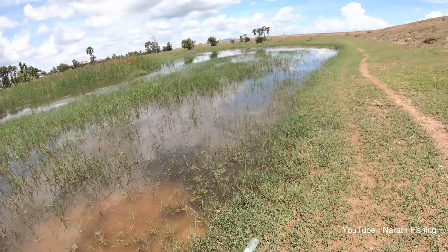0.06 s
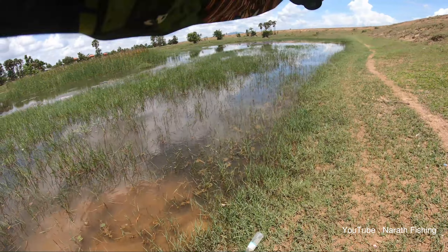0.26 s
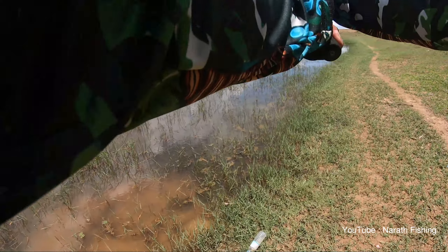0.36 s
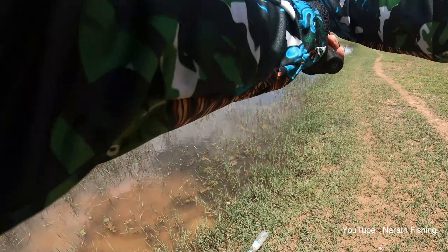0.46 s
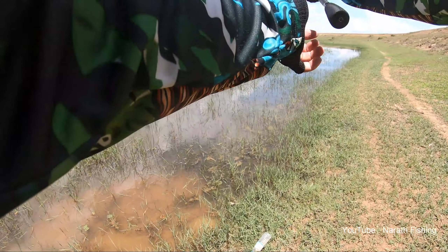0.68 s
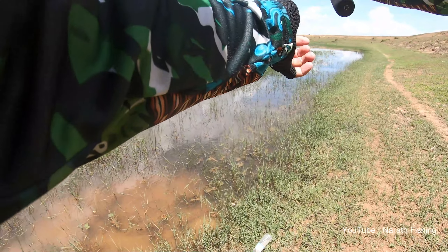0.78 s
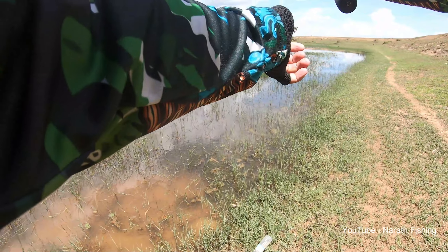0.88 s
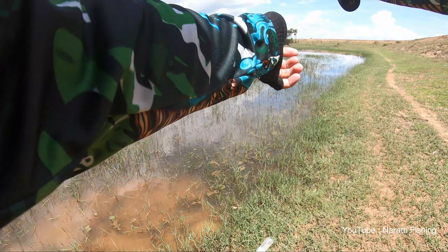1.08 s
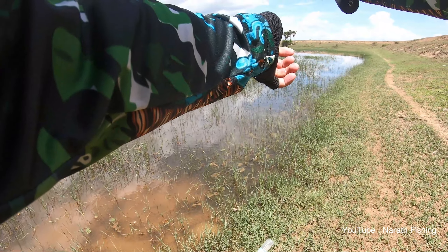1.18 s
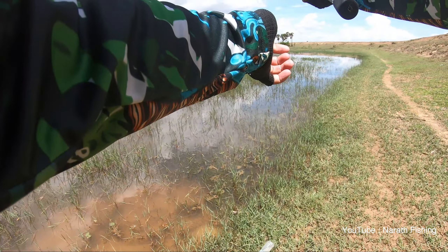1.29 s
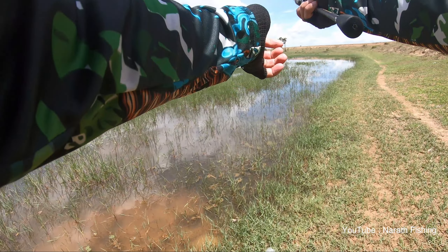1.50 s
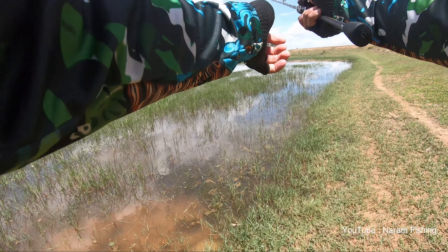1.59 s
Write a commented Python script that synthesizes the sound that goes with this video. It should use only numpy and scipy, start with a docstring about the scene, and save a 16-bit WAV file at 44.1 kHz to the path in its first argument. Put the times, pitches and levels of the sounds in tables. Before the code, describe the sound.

A fishing rod cast, heard from the angler's chest beside an open pond. Sleeves rustle and wind rumble builds from 0.2 seconds; at 0.35 a sharp bright whoosh lands with a knock and heavy low buffets, strongest on the right. The spool whines downward until about 0.8, amid small scuffs. Faint ticks follow around 1.15-1.35 over fading wind, thin bird whistles and insect hiss.

```python
"""Bank of a pond: an angler casts, with a two-port microphone on the chest.
Wind is low-frequency buffets, rumble and flutter, strongest on the right port; the sleeves rustle as dense grains.
Rod and line whoosh past as shaped noise, the spool whines in odd harmonics, filtered clicks make the tackle tick
and swells of band noise make the scuffs and the whoosh's narrow whistling bands. A small bird repeats an arched
whistle, a gliding sine, and insects sizzle in the grass as a narrow throbbing hiss, over the open field's noise."""
import sys
import numpy as np
from scipy import signal
from scipy.fft import rfft, irfft
from scipy.io import wavfile

SR = 44100
rng = np.random.default_rng(int(sys.argv[2]) if len(sys.argv) > 2 else 0)


def amplitude_ratio(level_db):
    """Convert a level in decibels to the matching linear amplitude (field) ratio."""
    exponent = np.asarray(level_db, float) / 20
    return 10 ** exponent


def digitize_waveform(pressure):
    """Quantize a signal to 16-bit integers and store it at the path in sys.argv[1].

    Rows of a 2-D input are taken as channels; values are limited to [-1, 1].
    """
    field = np.atleast_2d(pressure).T
    bounded = np.clip(field, -1, 1)
    quanta = np.round(bounded * 32767).astype(np.int16)
    wavfile.write(sys.argv[1], SR, quanta)


N = 72765   # samples, 1.65 s


def rms_one(x):
    """Scale to rms 1."""
    return x / np.sqrt(np.mean(x ** 2) + 1e-20)


def in_time(rows, shift=0):
    """Columns of a table as curves over all samples, moved later by shift seconds."""
    s, *columns = np.transpose(rows)
    return [np.interp(np.arange(N) / SR - shift, s, c) for c in columns]


def at_hz(points, hz):
    """Table read on a log-frequency axis."""
    p = np.array(points, float)
    return np.interp(np.log(hz + 1), np.log(p[:, 0] + 1), p[:, 1])


def shaped(x, points):
    """Colour by a table of dB over frequency; rms 1."""
    gain = amplitude_ratio(at_hz(points, np.fft.rfftfreq(N, 1 / SR)))
    return rms_one(irfft(rfft(x) * gain, N))


def band(x, low_hz, high_hz):
    """Band-pass, run twice for steep edges."""
    sos = signal.butter(2, [low_hz, high_hz], "band", fs=SR, output="sos")
    return signal.sosfilt(sos, signal.sosfilt(sos, x))


def drift(rate_hz):
    """Slow random wander of rms 1: noise through two equal one-pole low-passes."""
    r = np.exp(-2 * np.pi * rate_hz / SR)
    wander = signal.lfilter([1], [1, -2 * r, r * r], rng.standard_normal(N + SR))
    return rms_one(wander[SR:])   # the first second lets the filter settle


def tone(hz):
    """Sine of rms 1 that follows a pitch curve, from a random phase."""
    return np.sqrt(2) * np.sin(2 * np.pi * (np.cumsum(hz) / SR + rng.random()))


def hiss(spectrum, level_db):
    """Two unrelated draws of coloured noise under one level."""
    return shaped(rng.standard_normal((2, N)), spectrum) * amplitude_ratio(level_db)


def field():
    """Open field: a wide, nearly steady noise and a treble layer that rises and falls."""
    # Colour of the wide noise: (frequency [Hz], density [dB per Hz])
    field_colour = [(150, -5), (300, -2), (450, -12.5), (750, -9.5), (1400, -12), (2200, -5.5),
                    (4200, -12.5), (5700, -13), (7500, -15.5), (11000, -44), (15400, -60)]
    # Swell of the treble: (time [s], level [dB])
    treble_level = [(0, -57.5), (.16, -68.5), (.3, -54), (.8, -61.5), (1.12, -63), (1.3, -70),
                    (1.65, -71.5)]
    # Colour of the treble: (frequency [Hz], density [dB per Hz])
    treble_colour = [(2060, -37), (3500, -1.5), (4380, 0), (6120, -9), (7560, -3.5), (9820, -1),
                     (10900, -9), (14300, -41), (15400, -26)]
    wide = hiss(field_colour, -63.5 + 0.59 * drift(2.8))
    treble = hiss(treble_colour, in_time(treble_level)[0] + 0.46 * drift(36))
    return wide + treble


def insects():
    """Insects in the grass: noise in a narrow peak, its level throbbing at random."""
    # Swell of the sizzle: (time [s], level [dB])
    insect_level = [(.45, -67), (.6, -61), (1.0, -67.5), (1.2, -64.5), (1.4, -67.5), (1.5, -77),
                    (1.55, -84)]
    centre_hz, width_hz, throb_db = 7650, 500, 2.5
    peak = [(centre_hz - 3 * width_hz, -50), (centre_hz - width_hz / 2, -2), (centre_hz, 0),
            (centre_hz + width_hz / 2, -2), (centre_hz + 3 * width_hz, -50)]
    return hiss(peak, in_time(insect_level)[0] + throb_db * drift(62))


def bird():
    """Small bird: a sine on the same arched glide each time, its falling end weaker in the repeats."""
    # The whistle: (time after its start [s], pitch [Hz], level [dB])
    whistle = [(0, 6110, -17), (.03, 6620, 1), (.08, 6910, 1), (.17, 7450, -5.5), (.21, 7120, -4),
               (.235, 6170, 4), (.265, 4960, 3), (.28, 4950, -18)]
    # Each whistle: (start [s], level [dB], further level of the falling end [dB])
    calls = [(-.165, -64, 0), (.17, -64, -10), (.505, -65, -13), (.845, -65, -8)]
    turn_s = .19   # the falling end's level is reached here
    faded_whistle = [(-.01, whistle[0][1], -71)] + whistle + [(.3, whistle[-1][1], -60)]
    out = 0
    for start_s, db, end_db in calls:
        hz, level_db = in_time(faded_whistle, shift=start_s)
        falling = in_time([(turn_s - .04, 0), (turn_s, 1)], shift=start_s)[0]
        level = amplitude_ratio(db + level_db + end_db * falling + 1.2 * drift(40))
        out = out + level * tone(hz * (1 + .005 * drift(150)))
    return out


def wind():
    """Wind at the microphone: windowed sine buffets on the right port, rumble and flutter on both."""
    # Buffets: (centre [s], peak [dB], frequency [Hz], length [cycles])
    buffet_rows = [(.139, -22.5, 36.7, 3.4), (0.197, -19, 106, 2.4), (0.224, -22, 55.3, 5.6),
                   (0.261, -21, 94.5, 4.9), (0.266, -15.5, 38.2, 3.9), (0.303, -21, 95, 2.8),
                   (0.315, -10, 35.5, 2.7), (0.328, -10, 107, 3.15), (.344, -9, 24.7, 1.67),
                   (0.353, -2.5, 90, 1.71), (0.372, -17, 101, 0.81), (0.378, -16.5, 26, 1.5),
                   (0.42, -16.5, 39.4, 4.8), (0.435, -13.5, 101, 1.2), (.487, -22.5, 23.4, 1.6),
                   (0.526, -26.5, 87, 1.4), (0.595, -22.5, 67.5, 4.3), (0.74, -21, 43.4, 3.4),
                   (0.821, -24.5, 71.6, 3.2), (0.861, -21, 81, 1.26), (.894, -22, 77, 2.7),
                   (.92, -21, 69.4, 1.6), (0.966, -23.5, 67.3, 6.3), (0.974, -26.5, 116, 4.9),
                   (1.049, -17.5, 68, 1.36), (1.081, -25, 104.5, 2.1), (1.146, -23.5, 92, 1.77),
                   (1.288, -26.5, 36.4, 4.2), (1.356, -36.5, 121, 0.95), (1.529, -34.5, 39.6, 2.6)]
    # Rumble between the buffets: (time [s], right port [dB], left port [dB])
    rumble_level = [(0, -55, -50), (.1, -34, -44.5), (.22, -28, -40.5), (.3, -39, -39), (.42, -41, -40),
                    (.55, -31.5, -46.5), (.66, -47.5, -52.5), (.8, -36.5, -46), (1.0, -43, -52),
                    (1.1, -47, -41.5), (1.2, -63, -49.5), (1.28, -56.5, -51), (1.43, -61, -56),
                    (1.55, -52, -48.5), (1.65, -71, -53)]
    # Rumble at either port: (frequency [Hz], density [dB per Hz])
    right_colour = [(12, -11), (30, 9.5), (60, 3.5), (110, 10), (170, 1), (300, -47.5)]
    left_colour = [(12, -2), (28, -8), (50, 3), (90, -69), (170, -3), (300, -52.5)]
    # Flutter above the rumble: (time [s], level before the port gain [dB])
    flutter_level = [(0, -49.5), (.15, -45.5), (.27, -33), (.3, -30), (.345, -32), (.37, -31.5), (.45, -49),
                     (.6, -51.5), (.74, -65), (.775, -45.5), (.92, -52), (1.04, -55.5), (1.23, -68.5),
                     (1.36, -62), (1.45, -65.5), (1.62, -57.5)]
    # Colour of the flutter: (frequency [Hz], density [dB per Hz])
    flutter_colour = [(40, -43), (100, 1), (160, -0.5), (250, -3), (350, -11.5), (500, -26)]
    # Share of the flutter that reaches the left port: (frequency [Hz], gain [dB])
    flutter_to_left = [(100, -40), (200, -14.5), (300, -5.5), (450, 1)]
    # Wind dies away in the treble: (frequency [Hz], density [dB per Hz])
    above_wind = [(1200, -75), (16000, -140)]
    flutter_gain = amplitude_ratio(6.5)

    t = np.arange(N) / SR
    buffets = 0
    for (centre_s, db, hz, cycles), phase in zip(buffet_rows, rng.random(len(buffet_rows))):
        u = np.clip((t - centre_s) * hz / cycles, -.5, .5)
        swell = np.cos(np.pi * u) ** 2
        buffets = buffets + amplitude_ratio(db) * swell * np.sin(2 * np.pi * (hz * (t - centre_s) + phase))

    right_db, left_db = in_time(rumble_level)
    right = shaped(rng.standard_normal(N), right_colour + above_wind) * amplitude_ratio(right_db + 3.2 * drift(5))
    left = shaped(rng.standard_normal(N), left_colour + above_wind) * amplitude_ratio(left_db)

    flutter = hiss(flutter_colour + above_wind, in_time(flutter_level)[0] + 2.05 * drift(23.6))
    # The left port gets the right port's flutter inverted, mixed with an unrelated draw
    mixed = 0.51 * flutter[0] - 0.36 * flutter[1]
    left_gain = amplitude_ratio(at_hz(flutter_to_left, np.fft.rfftfreq(N, 1 / SR)))
    left_flutter = irfft(rfft(mixed) * left_gain, N)
    return np.array([left + left_flutter * flutter_gain, right + buffets + flutter[1] * flutter_gain])


def rustle():
    """Sleeves: creases of the cloth are dense random grains of uneven strength, coloured."""
    # Movement of the sleeves: (time [s], level [dB])
    rustle_level = [(0, -49), (.08, -48.5), (.17, -52.5), (.23, -48), (.26, -40.5), (.33, -42), (.4, -44.5),
                    (.45, -49), (.58, -50), (.66, -61), (.75, -61), (.82, -56.5), (1.0, -59.5), (1.1, -69),
                    (1.3, -69.5), (1.65, -78)]
    # Colour of the cloth: (frequency [Hz], density [dB per Hz])
    cloth = [(240, 0), (400, 0), (438, -10), (614, -6), (683, -12.5), (859, -4), (1260, -10.5),
             (1630, -4.5), (3200, -3), (3900, -13), (9920, -34.5), (15400, -45)]
    creases_per_s, spread_db = 7000, 3
    level_db = in_time(rustle_level)[0] + 1.36 * drift(16.7)
    struck = rng.random((2, N)) < creases_per_s / SR
    strength = amplitude_ratio(spread_db * np.minimum(rng.exponential(1, (2, N)), 4))
    grains = rng.standard_normal((2, N)) * struck * strength
    return shaped(grains, cloth) * amplitude_ratio(level_db)


def scuffs_and_whistling_bands():
    """Short scuffs of cloth, grip and line, and the whoosh's narrow whistling bands: swells of band noise."""
    # Scuffs and whistling bands: (start [s], length [s], level [dB], low edge [Hz], high edge [Hz])
    swell_rows = [(0.253, 0.042, -37, 2280, 3290), (0.242, 0.1, -46, 650, 1110),
                  (0.311, .012, -37, 770, 1270), (0.316, 0.0094, -45, 770, 1240),
                  (.25, 0.028, -63, 9000, 10900), (0.352, 0.038, -37, 1840, 4360),
                  (0.38, .04, -41.5, 4900, 5210), (0.379, 0.033, -40.5, 9500, 10200),
                  (0.363, 0.027, -51.5, 1780, 2010), (.64, 0.04, -55, 4190, 4640),
                  (.64, 0.032, -56, 4600, 4950), (.64, .08, -61.5, 8800, 11000),
                  (.683, 0.021, -52.5, 1190, 3520), (0.763, 0.021, -58.5, 810, 1280),
                  (0.81, 0.012, -55, 9200, 10400), (0.803, 0.025, -60, 4000, 4960),
                  (0.866, 0.014, -54.5, 900, 1690), (0.975, 0.038, -62, 4320, 4740)]
    t = np.arange(N) / SR
    out = 0
    for start_s, length_s, db, low_hz, high_hz in swell_rows:
        swell = np.sin(np.pi * np.clip((t - start_s) / length_s, 0, 1))
        noise = rms_one(band(rng.standard_normal(N), low_hz, high_hz))
        out = out + amplitude_ratio(db) * swell * noise
    return out


def ticks():
    """Tackle: each tick is a one-sample click ringing through a broad, steep band."""
    # Ticks: (time [s], click before the band-pass [dB], low edge [Hz], high edge [Hz])
    tick_rows = [(0.3265, -13, 910, 4300), (.3445, 4.5, 417, 1280), (.386, -2, 700, 1500),
                 (1.153, -22.5, 2480, 3880), (1.2346, -19.5, 930, 2020), (1.2351, -17.5, 2320, 4140),
                 (1.3077, -15.5, 446, 1230), (1.306, -15.5, 1190, 2570), (1.3058, -26, 3180, 7000),
                 (1.356, -25, 503, 1120)]
    sample = np.arange(N)
    out = 0
    for s, db, low_hz, high_hz in tick_rows:
        click = amplitude_ratio(db) * (sample == int(s * SR)) + 1e-18   # the offset keeps the filter off denormals
        out = out + band(click, low_hz, high_hz)
    return out


def spool():
    """Spool running free: odd multiples of its turning rate, whose pitch follows the turns."""
    # The run: (time [s], turning rate [turns per s], level [dB])
    run = [(.37, 390, -96), (.42, 360, -45), (.5, 342, -48.5), (.6, 315, -55), (.7, 277, -61),
           (.78, 350, -65)]
    # Harmonics: (multiple of the turning rate, level [dB])
    orders = [(1, 0), (3, -20), (5, -6)]
    turns, level_db = in_time(run)
    start_s, end_s = run[0][0], run[-1][0]
    running = in_time([(0, 0), (start_s, 1), (end_s, 1), (end_s + .05, 0)])[0] == 1
    turns = turns * (1 + .006 * drift(24.7))
    out = 0
    for multiple, db in orders:
        out = out + amplitude_ratio(level_db + db + 0.59 * drift(37)) * tone(multiple * turns)
    return running * out


def whoosh():
    """Rod and line cutting the air: smooth bright noise that swells as they pass."""
    # The pass: (time [s], level before the gain [dB])
    passing = [(.325, -60), (.344, -48.5), (.356, -39), (.385, -38), (.408, -40), (.42, -43), (.435, -46),
               (.455, -52), (.476, -53), (.63, -60.5), (.66, -58), (.7, -56.5), (.73, -66), (.8, -64)]
    # Colour of the cut air: (frequency [Hz], density [dB per Hz])
    air = [(470, -7.5), (800, -14.5), (1060, -8.5), (1640, -12.5), (1980, -3.5), (2160, -6.5), (4590, -7.5),
           (4940, -6.5), (6740, -10), (10100, -11.5), (11800, -30.5), (14300, -33), (15400, -50)]
    gain_db = 3.5
    faded = [(passing[0][0] - .02, -90)] + list(passing) + [(passing[-1][0] + 0.14, -90)]
    return hiss(air, in_time(faded)[0] + gain_db + .8 * drift(90))


def ports(near, diffuse):
    """Airborne sound at the two ports: shifted in phase, tilted in level, partly unlike, coloured."""
    # Phase lead of the left port: (frequency [Hz], lead [radians])
    left_leads = [(200, 4.75), (520, 4.07), (1120, 3.425), (1810, 4.8), (2670, 5.25), (4310, 6.5),
                  (7000, 7.7), (11000, 6.4), (15000, 6.3)]
    # Left port over right port: (frequency [Hz], level [dB])
    left_louder = [(300, -1.5), (700, -1.2), (1290, -.8), (2380, -1.5), (4400, 5), (8120, 3.5),
                   (12000, 3.5), (15000, 3.5)]
    # Likeness of diffuse sound at the two ports: (frequency [Hz], correlation [0-1])
    likeness = [(300, 0.76), (700, 0.95), (1400, 0.62), (3000, 0.87), (6000, 0.56), (10000, 0.2),
                (15000, 0)]
    # Colour that both ports give: (frequency [Hz], gain [dB])
    port_colour = [(200, 11.5), (400, 3), (700, 11.5), (1100, 13), (1800, 3.5), (3000, 1), (8000, -2),
                   (11000, -1.5), (12500, 10), (14500, 4.5), (15500, -16)]
    hz = np.fft.rfftfreq(N, 1 / SR)
    alike = np.clip(at_hz(likeness, hz), 0, 1)
    shared, other = rfft(diffuse)
    direct = rfft(near)
    left = shared + direct
    right = alike * shared + np.sqrt(1 - alike ** 2) * other + direct
    right = right * np.exp(-1j * at_hz(left_leads, hz))
    tilt = amplitude_ratio(at_hz(left_louder, hz) / 2)   # half up on the left, half down on the right
    return irfft(np.array([left * tilt, right / tilt]) * amplitude_ratio(at_hz(port_colour, hz)), N)


def scene():
    """Wind on the ports plus everything that arrives through the air."""
    diffuse = field() + insects() + rustle() + whoosh()
    near = bird() + scuffs_and_whistling_bands() + ticks() + spool()
    return wind() + ports(near, diffuse)


def band_limit(x):
    """A steep low-pass at the top of the band."""
    return signal.sosfilt(signal.butter(12, 15600, fs=SR, output="sos"), x)


def record(dry):
    """Pass the finished mix of the two ports through band_limit()."""
    return band_limit(dry)


dry = scene()
out = record(dry)
digitize_waveform(out)
```